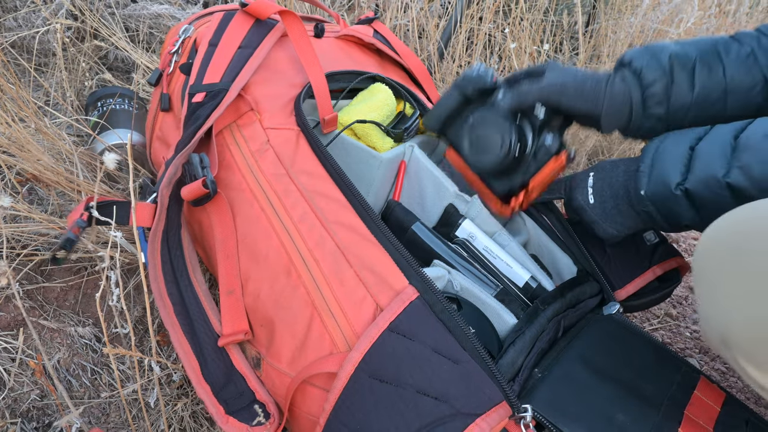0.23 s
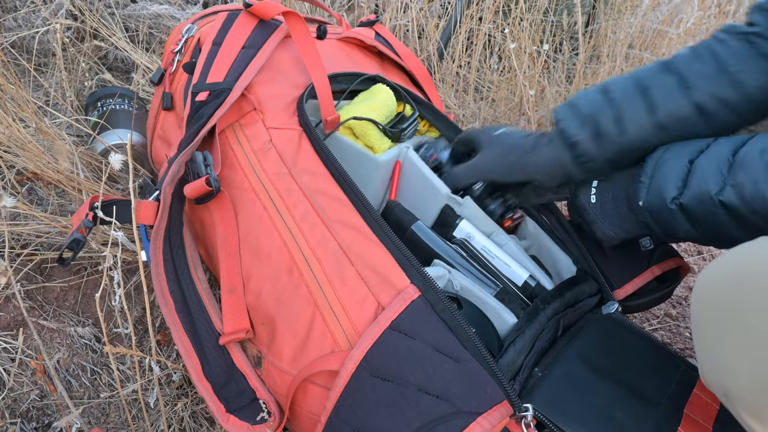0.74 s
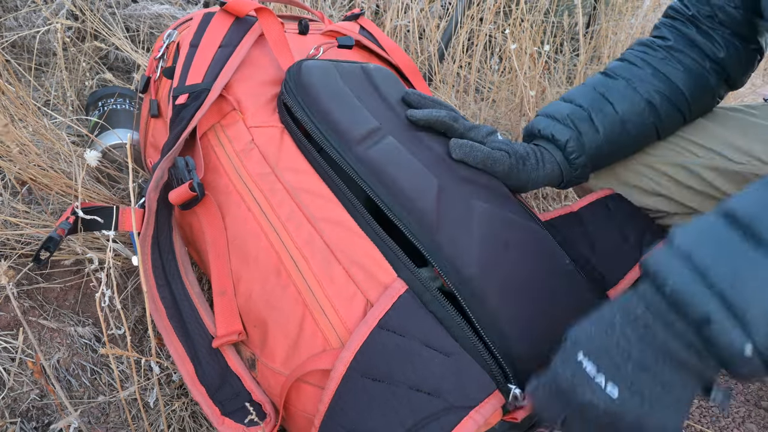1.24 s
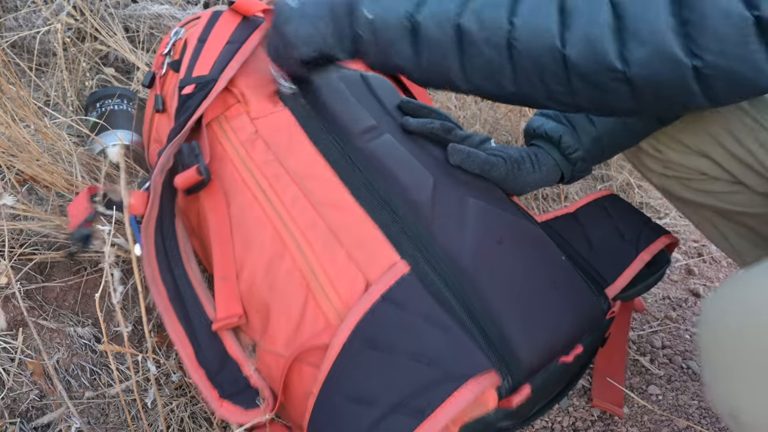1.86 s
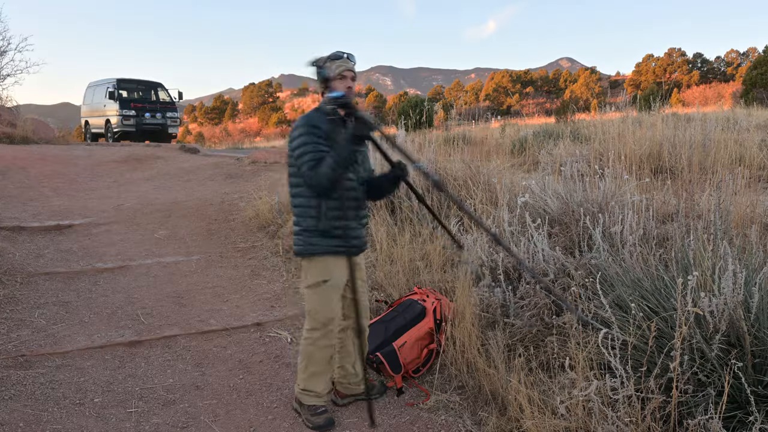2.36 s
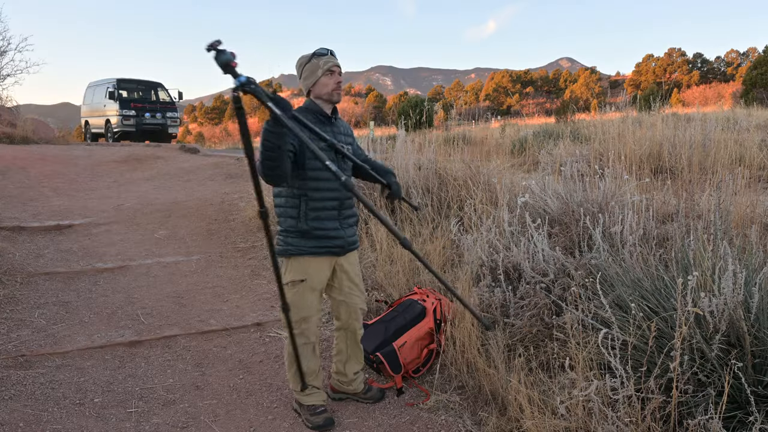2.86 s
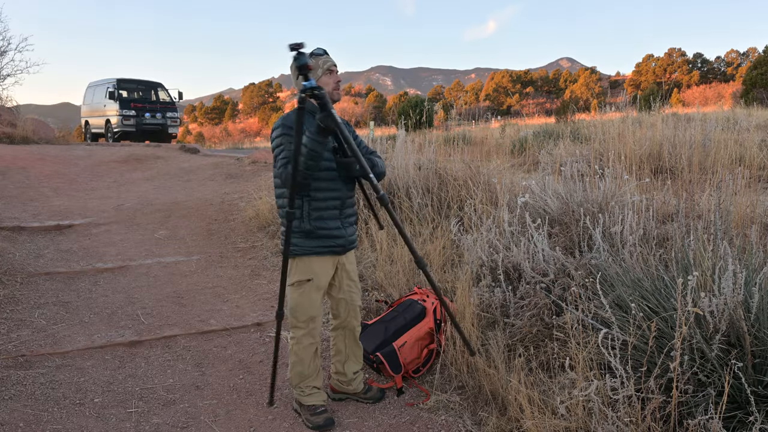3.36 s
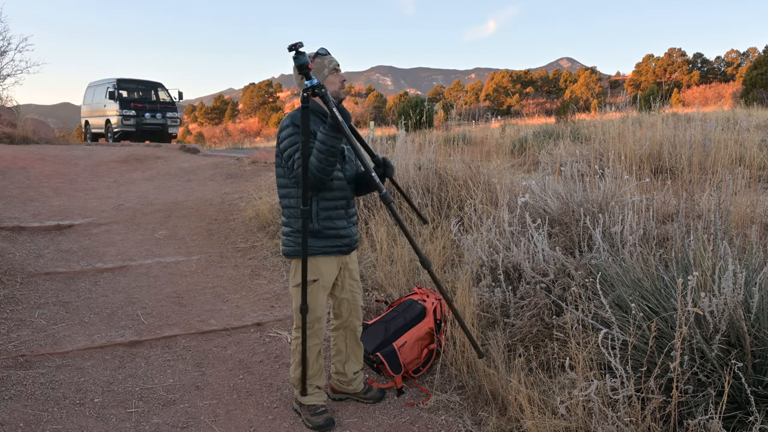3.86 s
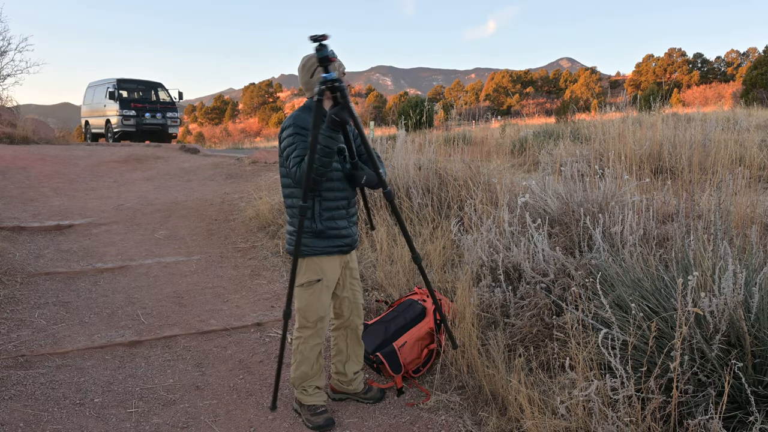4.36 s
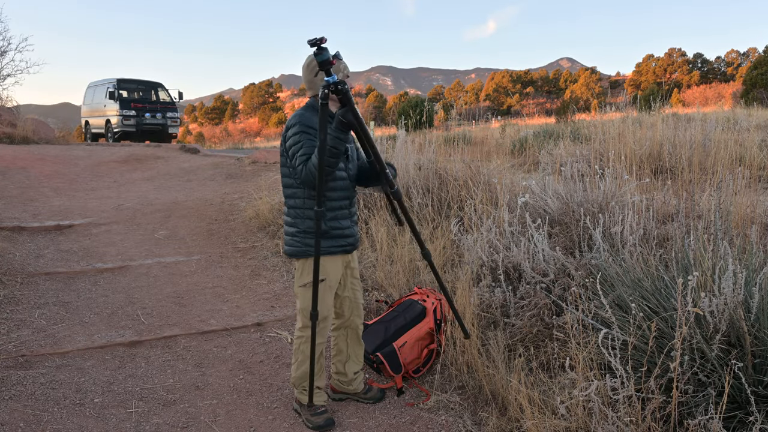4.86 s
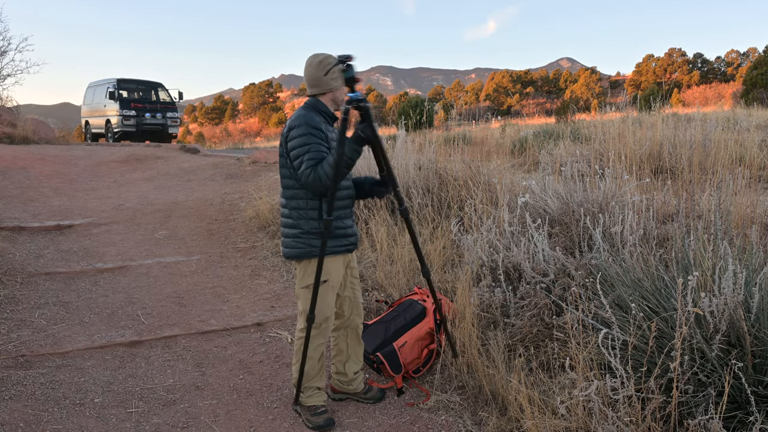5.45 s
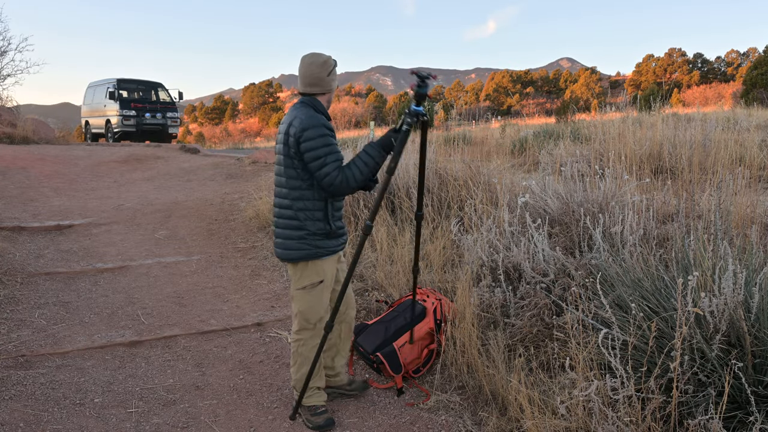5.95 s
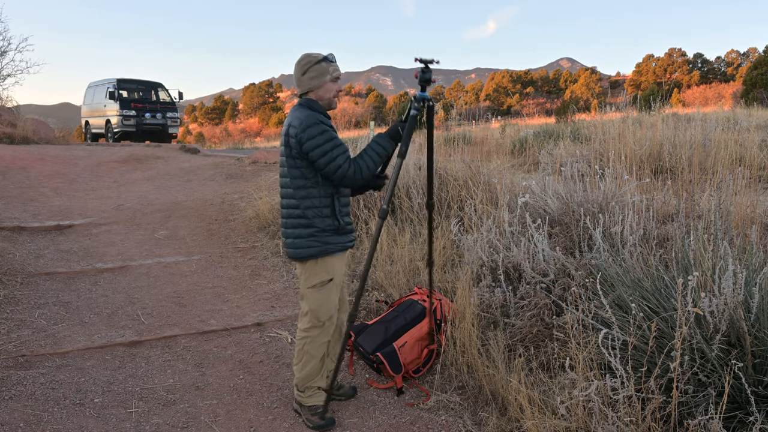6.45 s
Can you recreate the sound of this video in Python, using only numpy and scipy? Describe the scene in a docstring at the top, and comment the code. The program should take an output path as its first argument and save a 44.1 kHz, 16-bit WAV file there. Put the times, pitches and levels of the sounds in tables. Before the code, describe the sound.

Gear is pressed into a padded backpack, its zipper whips shut in two short runs, then tripod legs hiss out to hard clacks outdoors.

```python
"""Outdoors in quiet air, hands in a nylon jacket press gear into a padded backpack and tug a divider's fastening.
Its zipper is pulled shut in two runs: each tooth is a tap that rings the slider, the tape and the bag.
Then a tripod is unfolded: locks click, and two leg tubes slide out with a hiss, each to a hard clack of ringing
modes and noise. Throughout, sleeves rustle as patchy coloured noise, and small knocks and ticks ring briefly."""
import sys
import numpy as np
from scipy import signal
from scipy.fft import rfft, irfft
from scipy.io import wavfile
from scipy.ndimage import uniform_filter1d

SR = 44100
rng = np.random.default_rng(int(sys.argv[2]) if len(sys.argv) > 2 else 0)


def int16_out(signal):
    """Quantize to a 16-bit WAV file."""
    q = np.round(np.clip(np.atleast_2d(signal).T, -1, 1) * 32767)
    wavfile.write(sys.argv[1], SR, q.astype(np.int16))


def voltage_ratio(level):
    """Linear amplitude factor for a level in decibels (scalar or array-like)."""
    return 10 ** (np.asarray(level, float) / 20)


N = 296295  # length of the scene in samples


def evened(x):
    """Scales a sound to an rms of 1."""
    return x / np.sqrt(np.mean(x ** 2) + 1e-20)


def read(points, hz):
    """Reads a curve of (Hz, dB) along a logarithmic frequency scale."""
    f, value = np.transpose(points)
    return np.interp(np.log(hz + 1), np.log(f + 1), value, left=-90)


def add(mix, s, sound):
    """Adds a sound to the mix from s seconds on."""
    part = mix[round(s * SR):][:len(sound)]
    part += sound[:len(part)]


def spread(rows):
    """Start time and the columns of a table, one value a sample."""
    s, *columns = np.transpose(rows)
    t = np.arange(s[0], s[-1], 1 / SR)
    return s[0], [np.interp(t, s, c) for c in columns]


def noise(spectrum, patchy_db, grain_db, grains_per_s=3000):
    """Coloured noise in drifting patches, partly made of separate fibre snaps."""
    snap_now = rng.random(N) < grains_per_s / SR
    snaps = voltage_ratio(grain_db * np.minimum(rng.exponential(1, N), 3.3)) * snap_now
    grainy = rng.standard_normal(N) * (1 + snaps)
    hz, t, z = signal.stft(grainy, SR, nperseg=512, noverlap=384)
    # patches are smooth both in pitch and in time
    patches = uniform_filter1d(rng.standard_normal(z.shape), size=8, axis=0)
    patches = uniform_filter1d(patches, size=10, axis=1)
    z = z * voltage_ratio(read(spectrum, hz)[:, None] + patchy_db * evened(patches))
    return evened(signal.istft(z, SR, nperseg=512, noverlap=384)[1][:N])


def ring(hz, t60, turn=0):
    """A struck mode: a sine that falls by 60 dB in t60 seconds; turn is its starting phase in cycles."""
    t = np.arange(round(t60 * SR) + 9) / SR
    wave = voltage_ratio(-60 * t / t60) * np.sin(2 * np.pi * (hz * t + turn))
    return signal.lfilter(*signal.butter(1, hz / 2, "high", fs=SR), wave)  # a small thing moves no slow air


def rings(x, modes):
    """x strikes every mode, neighbours in opposite sense; a wider mode dies sooner, t60 = 1.8 / width."""
    out = 0
    for k, (hz, width, db) in enumerate(modes):
        struck = signal.fftconvolve(x, ring(hz, 1.8 / width))[:len(x)]
        out = out + (-1) ** k * voltage_ratio(db) * struck
    return out


def quiet_air():
    """The quiet outdoor air: steady noise, strongest in the low range."""
    # Colour of the air. Each row: frequency in Hz, relative level in dB per Hz.
    air_colour = [(18, -41), (30, -11), (43, -15), (90, 7), (157, 5.5), (584, -4.5), (1670, -7.5),
                  (2900, -12.5), (11700, -24.5), (16000, -26.5)]
    return voltage_ratio(-65) * noise(air_colour, 0.38, 0)


def strokes(start, held, db):
    """Loudness, one value a sample, of strokes that come up, hold and die away, long ones slowly; powers add."""
    t = np.arange(0, N + 64, 64)[:, None] / SR
    rising, falling = np.maximum(start - t, 0), np.maximum(t - start - held, 0)
    # time to gain or lose 10 dB: a base in seconds plus a share of the time held
    rise_s, fall_s = 0.0078 + .08 * held, 0.0078 + 0.27 * held
    lost_db = 10 * (rising / rise_s + falling / fall_s)
    loudness = np.sqrt((voltage_ratio(db - lost_db) ** 2).sum(1))
    return np.interp(np.arange(N) / SR, t[:, 0], loudness)


def hooks():
    """Single hooks of the dividers' fastening let go, one thin snap each."""
    # When the fastening is tugged: from and to, in seconds.
    tugged_s = (.47, .77)
    size = voltage_ratio(4 * np.minimum(rng.exponential(1, N), 2)) * (rng.random(N) < 130 / SR)  # about 130 a second
    size *= abs(np.arange(N) / SR - np.mean(tugged_s)) < np.ptp(tugged_s) / 2
    snaps = signal.lfilter([1], [1, -.85], size) * rng.standard_normal(N)
    return evened(signal.lfilter(*signal.butter(2, 4000, "high", fs=SR), snaps))


def handling():
    """One rubbing effort moves the weave and the slick coat; pressing adds dull padding; hooks snap."""
    # Colours of rubbed weave, slick coat and padding. Each row: frequency in Hz, relative level in dB per Hz.
    weave_colour, coat_colour, padding_colour = [(120, -18.5), (400, 0), (1500, -2.5), (3000, -3.5),
                                                 (4500, -10), (6200, -18.5), (8000, -28)], [(4500, -40.5), (6200, -5.5), (8000, -3),
                                                              (11000, -4.5), (15500, -9.5)], [(60, -40), (150, -9.5),
                                                                             (350, 1), (500, 0.5),
                                                                             (800, -32)]
    # Strokes of sleeves and gloves over nylon; the shortest are quick scuffs.
    # Each row: start in seconds, time held in seconds, weave level in dB, coat level in dB above the weave.
    stroke_rows = [(0, .46, -64.5, -13.5), (.5, 0.14, -61, 1.5), (.68, 0.105, -57.5, -17),
                   (.8, .19, -58.5, -8), (.758, 0.012, -53, -8), (1.19, 0, -59.5, -12),
                   (1.8, 0.074, -63.5, -8), (2.139, 0.11, -58, -11.5), (2.3, 0.13, -65.5, -13),
                   (2.475, .14, -56, -7.5), (2.598, 0.038, -57.5, -6.5), (2.65, .12, -62.5, -7),
                   (2.799, 0.051, -56, -5.5), (2.825, 0.0043, -47.5, 0.5), (2.889, 0.039, -61.5, -6.5),
                   (3.169, 0.022, -51.5, -1), (3.2, 0.19, -58.5, -8.5), (3.28, .06, -54.5, -10.5),
                   (3.41, 0.0084, -53.5, -6.5), (3.465, .09, -53.5, -7.5), (3.56, .07, -56, -3),
                   (3.495, 0.0021, -46.5, -8.5), (3.63, 0.2, -62, -9.5), (4.025, .15, -57.5, -10.5),
                   (4.098, .016, -46.5, -2.5), (4.28, 0.024, -63.5, -8.5), (4.325, 0.092, -56.5, -9.5),
                   (4.351, 0.019, -49.5, -14), (4.412, 0.0091, -52.5, -8), (4.46, 0.14, -65, -8),
                   (4.625, 0.027, -49, -17), (4.754, 0.0051, -53.5, -8.5), (4.785, 0.111, -59, -8.5),
                   (4.791, 0.035, -52, -11), (4.853, 0.0092, -47.5, -13.5), (5.09, 0.035, -73, 5.5),
                   (5.689, 0.11, -63.5, -14), (5.769, 0.021, -52.5, -15), (5.87, 0.099, -56, -8),
                   (5.92, 0.022, -47, -19), (5.975, .05, -53, -14), (6.14, .03, -56.5, -14.5),
                   (6.18, .15, -66, -13), (6.335, .04, -57.5, -15.5), (6.39, 0.071, -61, -12),
                   (6.46, 0.21, -63, -13)]
    # Gear pressed into the padded dividers. Each row: start in seconds, time held in seconds, level in dB.
    pressing_rows = [(.2, 0.042, -62), (.37, 0.28, -58.5), (.58, 0.052, -51.5), (.68, 0.076, -52),
                     (.82, 0.196, -71), (1.3, 0.059, -83)]
    weave = noise(weave_colour, 2.3, 5.8, 1300)
    coat = noise(coat_colour, 1.5, 2.8, 1300)
    padding = noise(padding_colour, 2.3, 1.7, 280)
    start, held, db, sheen_db = np.transpose(stroke_rows)
    out = strokes(start, held, db) * weave + strokes(start, held, db + sheen_db) * coat
    return out + strokes(*np.transpose(pressing_rows)) * padding + voltage_ratio(-70.0) * hooks()


def tap(s, level_db, hz, t60):
    """A short blow rings two close modes and leaves a crumb of noise."""
    t60 = max(t60, .003)
    body = ring(hz, t60) + .5 * ring(1.39 * hz, t60, rng.random())
    t = np.arange(len(body)) / SR
    crumb = uniform_filter1d(rng.standard_normal(len(body)), size=int(SR / hz / 3) + 1)
    crumb = crumb * voltage_ratio(-60 * t / t60)
    rise = np.minimum(t * hz / 0.545, 1)  # full after about half a cycle
    return s, voltage_ratio(level_db) * rise * (1.01 * body + 0.74 * crumb)


def slides():
    """A tube rubs through its collar: smooth hiss, brighter when louder, that colours the air inside."""
    # Colours of the hiss, body and treble. Each row: frequency in Hz, relative level in dB per Hz.
    body_colour, treble_colour = [(300, -23.5), (1100, -10.5), (1600, -11), (2800, -4), (4400, -6),
                                  (6500, -13), (8000, -26)], [(4000, -29), (6500, -8), (10500, -0.5), (15500, -8)]
    # One table a leg. Each row: time in seconds, level of the hiss body in dB.
    slide_tables = [
        [(3.008, -61), (3.02, -50.5), (3.05, -44), (3.09, -44), (3.138, -41.5)],
        [(5.256, -64.5), (5.33, -48.5), (5.44, -45), (5.48, -49), (5.548, -50)],
    ]
    # Starting resonance of the air in each tube, in Hz.
    pipe_start_hz = (1700, 1230)
    low, high = noise(body_colour, 1.8, 0), noise(treble_colour, 1.8, 0)
    out = np.zeros(N)
    fade = np.exp(-np.pi * 110 / SR)  # each resonance is 110 Hz wide
    for rows, pipe_hz in zip(slide_tables, pipe_start_hz):
        s, (db,) = spread(rows)
        now = slice(round(s * SR), round(s * SR) + len(db))
        t = np.arange(len(db)) / SR
        turn = np.exp(2j * np.pi * np.cumsum(pipe_hz + 3400 * t) / SR)  # rises by 3400 Hz a second
        pipe = 0
        for k in range(1, 4):  # three harmonics
            resonance = turn ** k * signal.lfilter([1 - fade], [1, -fade], low[now] / turn ** k)
            pipe = pipe + 2 * resonance.real / k
        pipe_db = 10 - 45 * t
        treble_db = 5.5 + .45 * (db + 45.5)  # treble over body; it gains .45 dB per dB of hiss
        out[now] = voltage_ratio(db) * (low[now] + voltage_ratio(pipe_db) * pipe + voltage_ratio(treble_db) * high[now])
    return out


def clack(s, peak_db, tilt_db, rattle_ms):
    """The collar chatters for a few ms, a crack; the tube takes up the blow and rings; the ground scatters it."""
    # Modes of the struck leg tube. Each row: frequency in Hz, relative level in dB, t60 in seconds.
    tube_modes = [(409, -40, .16), (484, -43, .11), (330, -22, .03), (520, -14, .025), (640, -16, .03),
                  (1400, -13, .025), (2050, -11, .015), (850, -10, .024), (1660, -5, .014),
                  (3100, -3, .011), (3500, -4, .011)]
    t = np.arange(SR // 3) / SR * 1000  # in ms
    crumbs = rng.standard_normal(len(t))
    crumbs = signal.lfilter(*signal.butter(1, [1500, 14000], "band", fs=SR), crumbs)
    chatter = crumbs * np.exp(-(t / rattle_ms) ** 3) * np.minimum(t / 0.054, 1)
    out = voltage_ratio(0.16 * tilt_db + 1.5) * chatter
    out += voltage_ratio(-38.0 - 0.49 * t) * crumbs  # scattered by the ground
    thud = rng.standard_normal(len(t))
    thud = evened(signal.lfilter(*signal.butter(2, [220, 1500], "band", fs=SR), thud))
    out += voltage_ratio(-4.5 - tilt_db - 1.9 * t) * np.minimum(t / 2, 1) * thud  # hands and joints take the blow
    for hz, db, t60 in tube_modes:
        tone = ring(hz, t60, rng.random())
        swell = 1 - np.exp(-(t[:len(tone)] * hz / 3500) ** 2)  # a mode takes a few cycles to build
        add(out, 0, voltage_ratio(db + 14.5 + tilt_db * np.log2(hz / 2000)) * swell * tone)
    return s, voltage_ratio(peak_db) * out / abs(out).max()


def zipper(pace, grip, scraping):
    """Each tooth the slider passes is one tap on slider, tape and bag, with a puff of scraping."""
    # Modes of the padded lid, a drum, and of the slider.
    # Each row: frequency in Hz, width in Hz, relative level in dB.
    bag_modes, slider_modes = [(239, 78, 2), (404, 100, 1), (860, 300, 0)], [(1900, 2420, 19.5), (3470, 1500, 1)]
    s, (rate,) = spread(pace)
    tail = 2000  # samples for the last taps to die away
    tooth_db, thump_db, tape_hz = (np.pad(c, (0, tail), "edge") for c in spread(grip)[1])
    loose = np.clip(70 / rate, .12, 1)  # slow teeth seat unevenly
    wobble = evened(uniform_filter1d(rng.standard_normal(len(rate)), size=300))
    teeth = np.cumsum(rate * (1 + .15 * loose * wobble)) / SR  # teeth passed so far
    at = np.flatnonzero(np.diff(np.floor(teeth)))
    late = (1 - teeth[at] % 1) / (teeth[at + 1] - teeth[at])  # share of a sample
    uneven_db = 3 * loose[at] * rng.standard_normal(len(rate))[at]
    force = voltage_ratio(tooth_db[at] + 1.2 * np.roll(wobble, 999)[at] + uneven_db)
    # each tap is shared between the two samples it falls between
    taps = np.zeros(len(tooth_db))
    taps[at] += force * (1 - late)
    taps[at + 1] += force * late
    puff = signal.lfilter([1], [1, -np.exp(-1 / (0.00414 * SR))], taps)  # dies away over about 4 ms
    # a loosely seated tooth judders for a few ms after the tap
    judder = .12 * np.pad(loose, (0, tail), "edge") * puff * rng.standard_normal(len(taps))
    soft = signal.lfilter(*signal.butter(2, 4600, fs=SR), taps + judder)
    turn = np.exp(2j * np.pi * np.cumsum(tape_hz) / SR)  # the free tape retunes as the slider moves
    tape_fade = np.exp(-np.pi * 400. / SR)  # 400 Hz wide
    tape = (turn * signal.lfilter([1], [1, -tape_fade], soft / turn)).imag
    drag = uniform_filter1d(puff, size=900)  # the cloth around the coil is dragged along
    scrape = (voltage_ratio(-20.5) * puff + voltage_ratio(-32) * drag) * scraping[round(s * SR):][:len(taps)]
    return s, rings(soft * voltage_ratio(thump_db), bag_modes) + rings(soft, slider_modes) + voltage_ratio(7.5) * tape + scrape


def scene():
    """Lays the air, the cloth, the tubes, the zipper and all the small blows into one mix."""
    # Colour of the slider on the coil. Each row: frequency in Hz, relative level in dB per Hz.
    scrape_colour = [(2000, -23), (4500, -10), (6500, -5), (8500, 1), (11800, -11.5), (15500, -6.5)]
    # A pair of tables a pull. Pace, each row: time in seconds, teeth per second.
    # Grip, each row: time in seconds, tooth level in dB, bag thump in dB relative to it, taut tape in Hz.
    pulls = [([(1.407, 66), (1.53, 68), (1.545, 130), (1.558, 300), (1.585, 380), (1.62, 805), (1.64, 920),
             (1.647, 770), (1.66, 790), (1.677, 1030), (1.692, 855), (1.705, 925), (1.727, 760),
             (1.745, 280), (1.76, 150), (1.81, 40)], [(1.407, -68, 12, 1800), (1.46, -60, 14, 1000),
             (1.53, -61, 14, 1000), (1.56, -46, 10, 1100), (1.62, -41, 3, 3300), (1.65, -41, -5, 2350),
             (1.7, -41, -5, 1850), (1.724, -41, 0, 2300), (1.745, -44, 18, 1500), (1.772, -47, 20, 1500),
             (1.787, -58, 14, 1500), (1.81, -62, 12, 1500)]), ([(1.926, 95), (1.96, 120), (1.977, 480),
             (1.987, 640), (1.994, 600), (2.006, 150), (2.05, 85), (2.09, 110), (2.1, 210), (2.126, 240)],
             [(1.926, -56, 16, 900), (1.977, -43, 12, 1000), (1.99, -46, 8, 2400), (2.01, -51, 9, 1500),
             (2.09, -58, 8, 1400), (2.1, -52, 10, 1300), (2.126, -52, 12, 1300)])]
    # Tube stops and lock levers. Each row: start in seconds, peak in dB,
    # tilt of the ringing in dB per octave about 2 kHz, rattle in ms.
    clack_rows = [(3.011, -35, 1.5, 1.2), (3.1378, 5, 1.5, 2.9), (5.2472, -25.5, 4.5, 0.75),
                  (5.5481, -4, -2.5, 4.26)]
    # Small knocks of gear. Each row: start in seconds, level in dB, frequency in Hz.
    knock_rows = [(.282, -47.5, 300), (0.354, -40, 262), (0.393, -25, 253), (0.434, -41.5, 263),
                  (0.756, -32, 520), (2.611, -35.5, 746), (3.291, -48, 353), (3.49, -30, 549),
                  (4.102, -39, 541), (4.381, -36, 910), (4.41, -34.5, 1002), (4.813, -56, 404),
                  (6.2141, -33, 784), (6.308, -44.5, 336.6)]
    # Ticks of buckles, pulls and levers. Each row: start in seconds, level in dB, frequency in Hz, t60 in seconds.
    tick_rows = [(.231, -47, 6950, .008), (.392, -48.5, 4260, 0.0098), (0.5332, -36.5, 6800, 0.01),
                 (0.7582, -30.5, 4230, 0.0041), (0.819, -34.5, 2720, 0.0048), (1.335, -55, 4630, .008),
                 (2.1005, -47.5, 8700, 0.032), (2.1127, -40.5, 8000, 0.016), (2.5132, -44, 1630, 0.02),
                 (2.7731, -40.5, 7830, 0.017), (2.9003, -46, 6000, 0.0071), (3.272, -40.5, 3530, 0.012),
                 (3.496, -32, 3390, 0.012), (3.99, -53, 6000, 0.0057), (4.285, -51.5, 3000, .006),
                 (4.3869, -38, 3830, 0.0045), (4.6249, -36, 1430, 0.032), (4.7484, -43.5, 1540, 0.012),
                 (4.7874, -40.5, 2170, 0.0071), (4.816, -41, 2620, 0.021), (5.154, -51, 6470, 0.0054),
                 (5.7674, -44, 2286, 0.017)]
    mix = quiet_air() + handling() + slides()
    scraping = noise(scrape_colour, 0.63, 0)
    for pace, grip in pulls:
        add(mix, *zipper(pace, grip, scraping))
    for row in clack_rows:
        add(mix, *clack(*row))
    for s, level_db, hz in knock_rows:
        add(mix, *tap(s, level_db, hz, 8 / hz))  # a padded knock rings for 8 cycles
    for row in tick_rows:
        add(mix, *tap(*row))
    return np.array([mix, mix])


def band_limit(x):
    """A steep low-pass at the top of the band."""
    return signal.sosfilt(signal.butter(12, 16250, fs=SR, output="sos"), x)


def record(dry):
    """Two microphone ports close together differ a little in the treble; loud clacks clip."""
    # How far the two channels differ. Each row: frequency in Hz, side over mid in dB, before a cut of 6 dB.
    apart = [(60, -32), (240, -36), (950, -36), (3770, -24), (15000, -2)]
    mid = signal.lfilter(*signal.butter(3, 80, "high", fs=SR), dry.mean(0))
    hz = np.fft.rfftfreq(N, 1 / SR)
    side = irfft(rfft(np.roll(mid, 40)) * voltage_ratio(read(apart, hz) - 6), N)  # 40 samples late
    clipped = np.clip([mid + side, mid - side], -1, 1)
    band = signal.oaconvolve(clipped, signal.firwin(127, 16000, fs=SR)[None], "same")  # low-pass at 16 kHz
    return band_limit(band)


dry = scene()
out = record(dry)
int16_out(out)
```